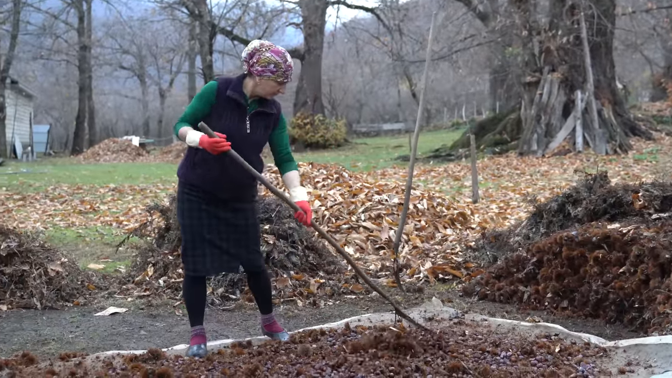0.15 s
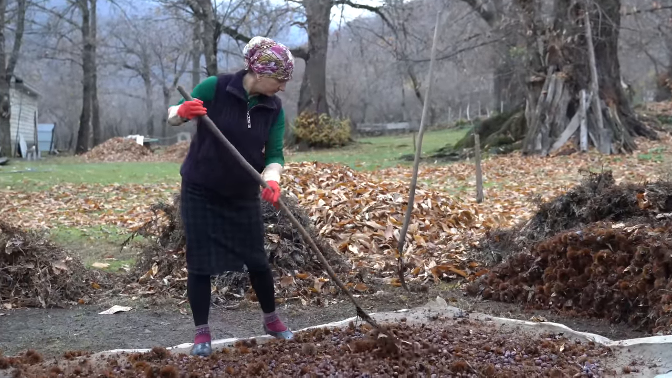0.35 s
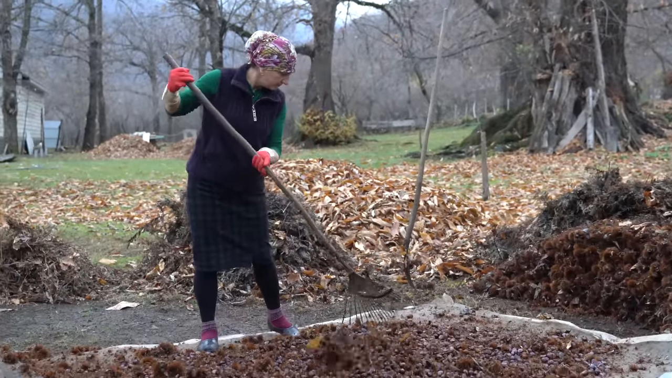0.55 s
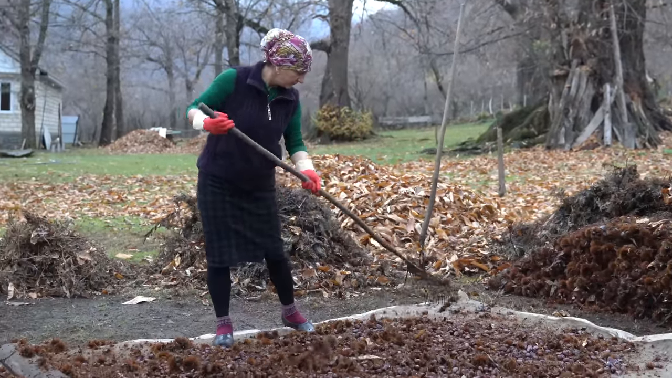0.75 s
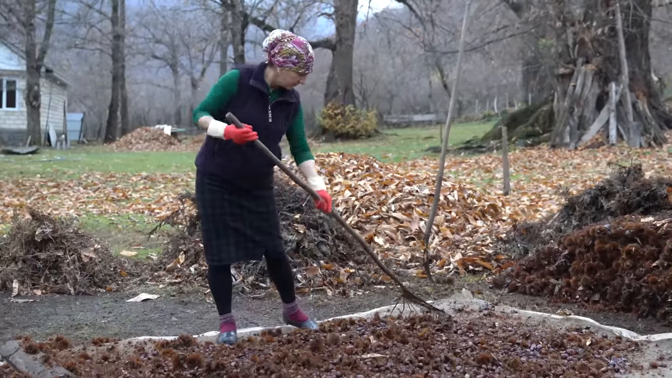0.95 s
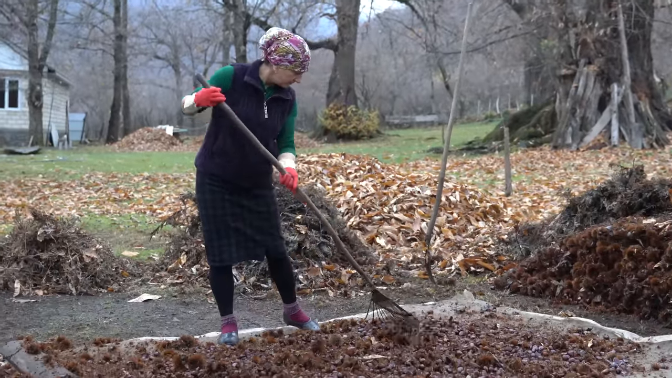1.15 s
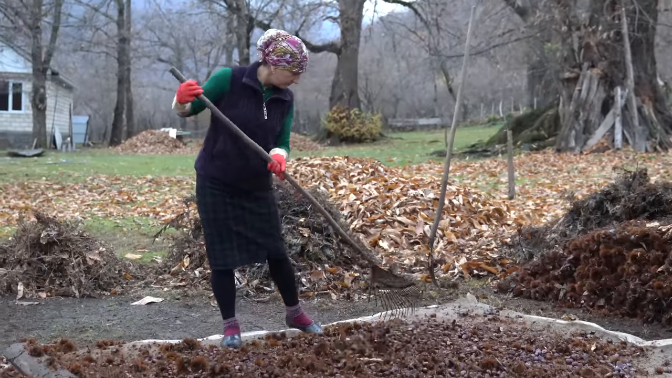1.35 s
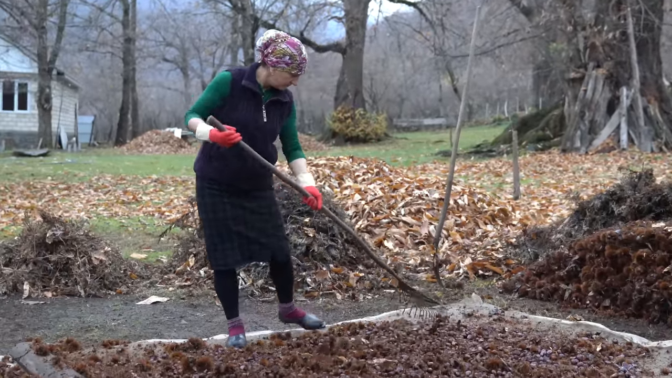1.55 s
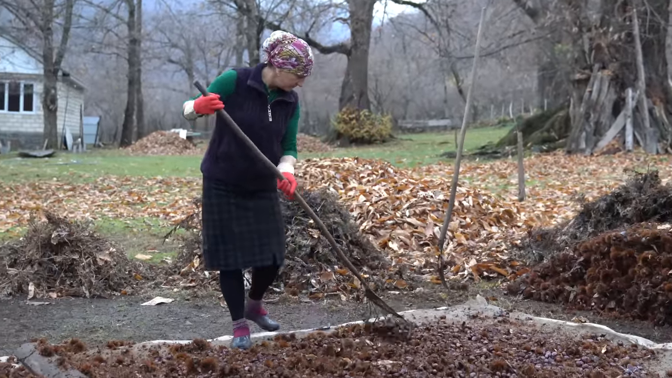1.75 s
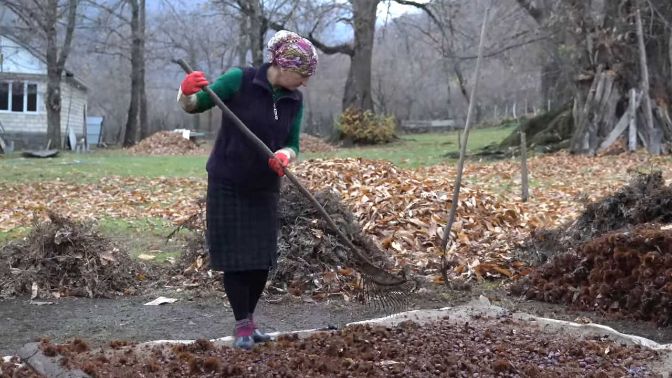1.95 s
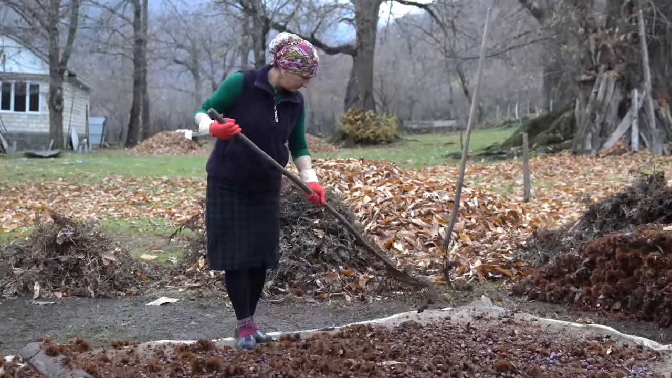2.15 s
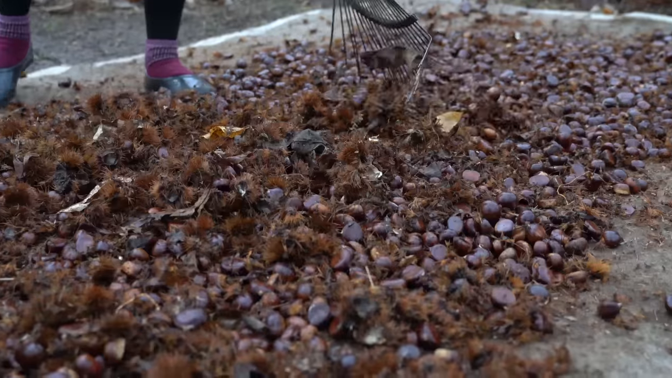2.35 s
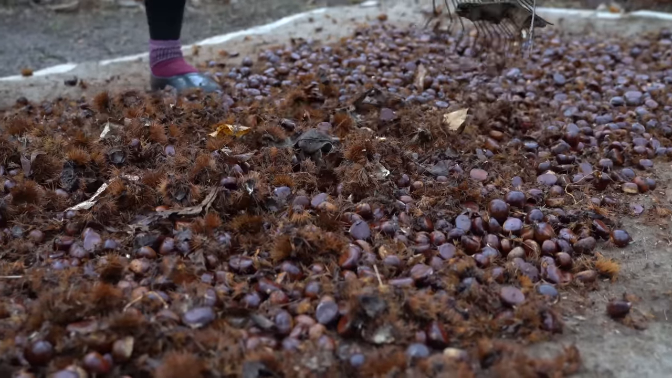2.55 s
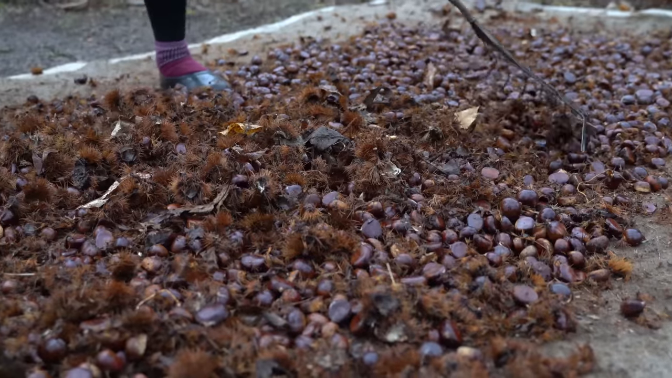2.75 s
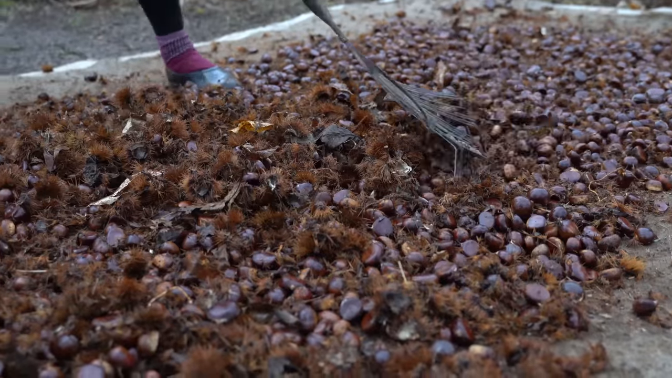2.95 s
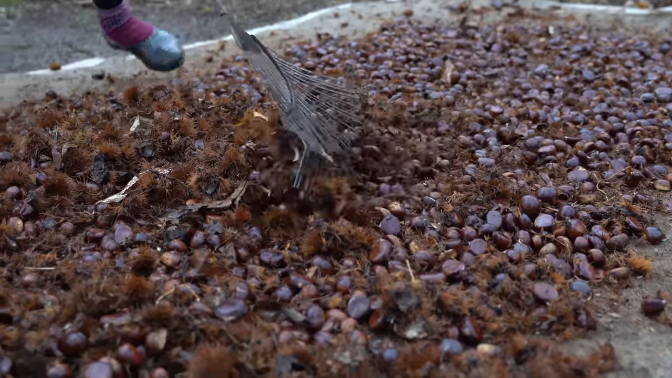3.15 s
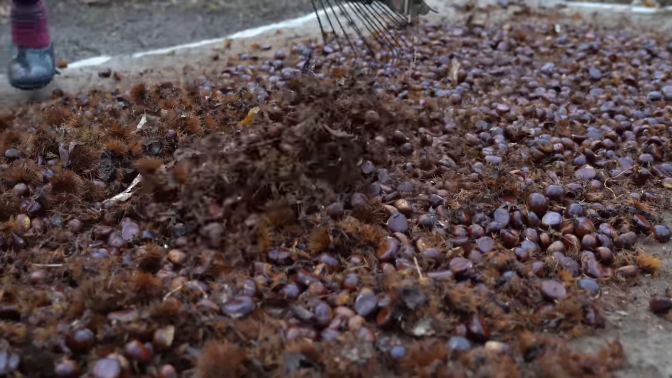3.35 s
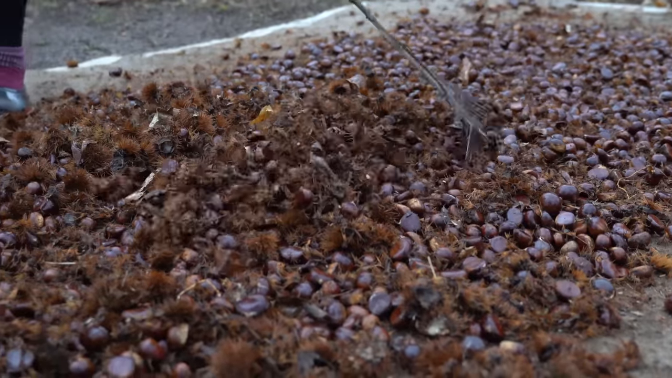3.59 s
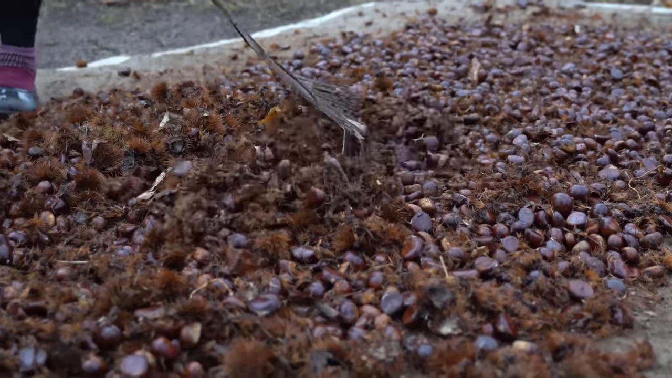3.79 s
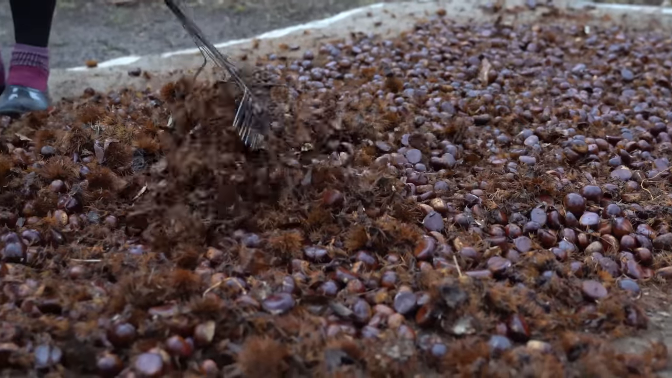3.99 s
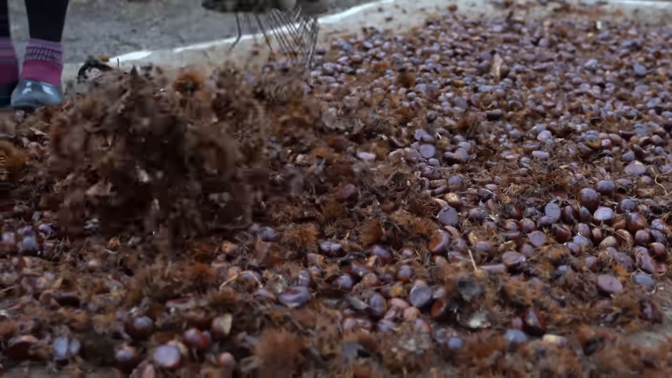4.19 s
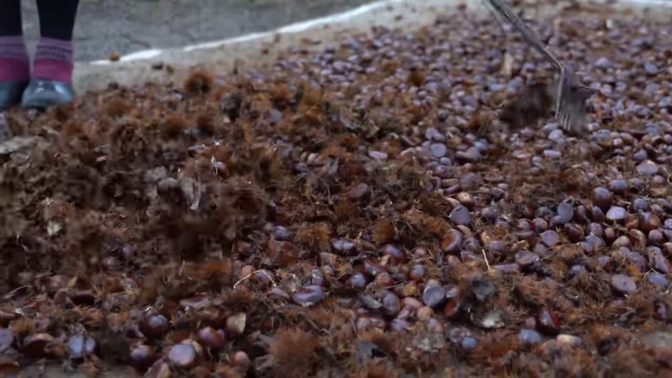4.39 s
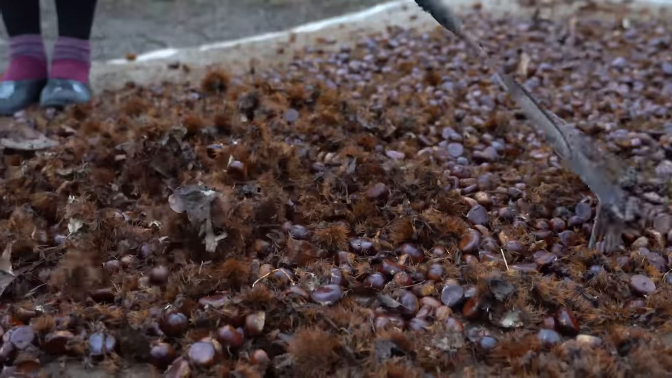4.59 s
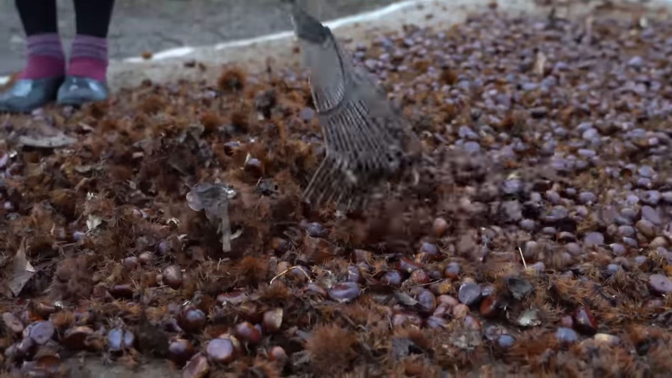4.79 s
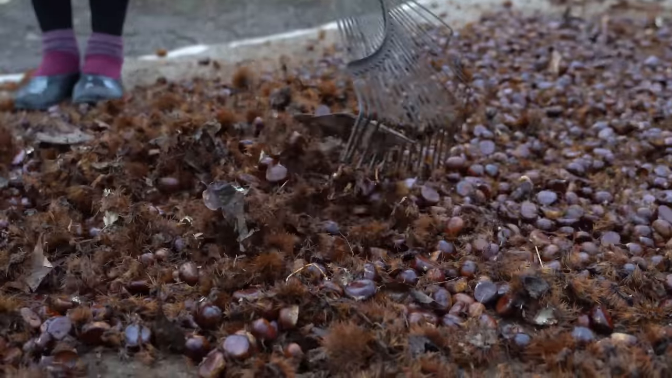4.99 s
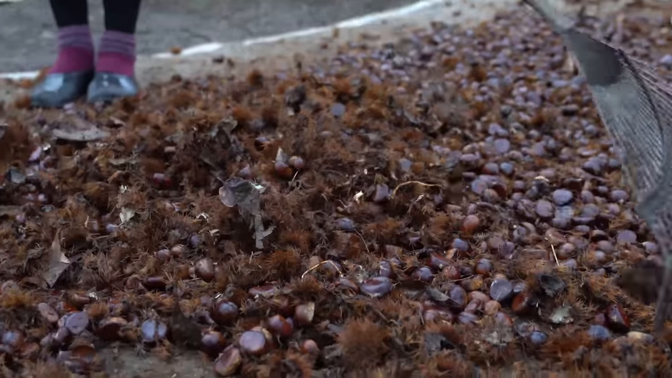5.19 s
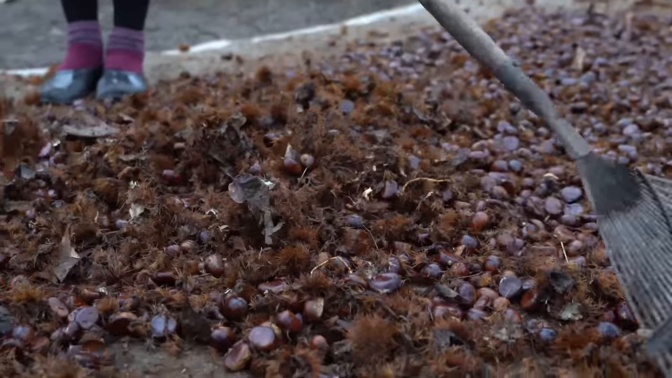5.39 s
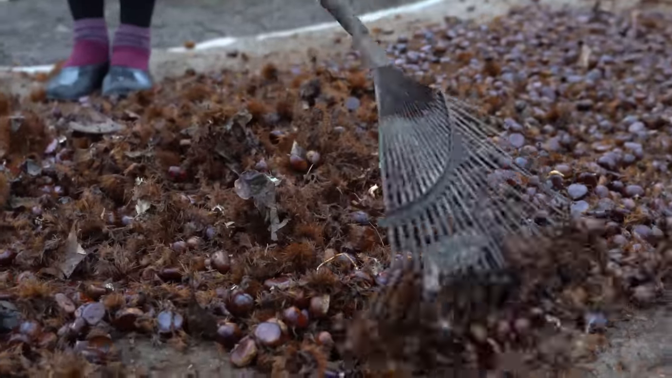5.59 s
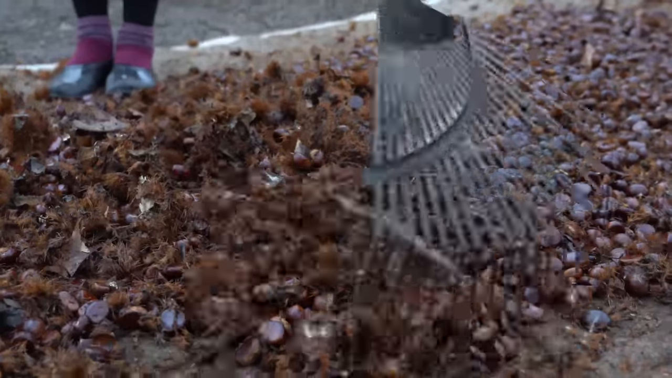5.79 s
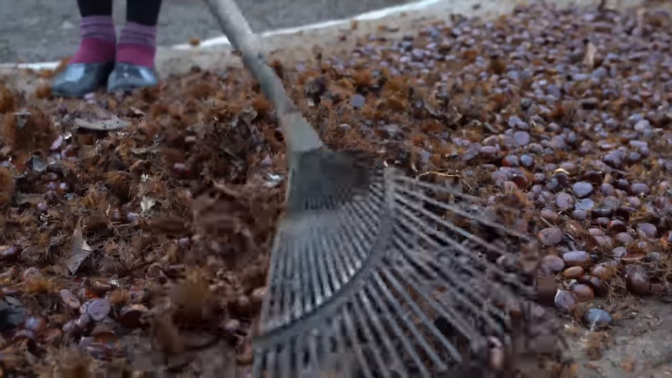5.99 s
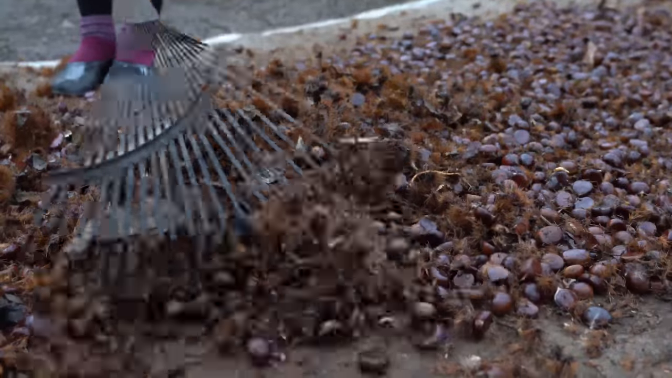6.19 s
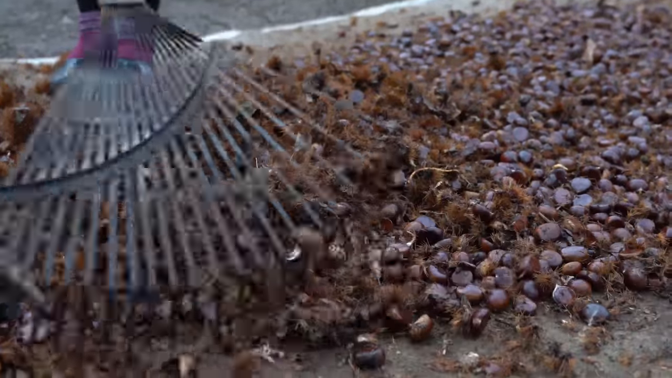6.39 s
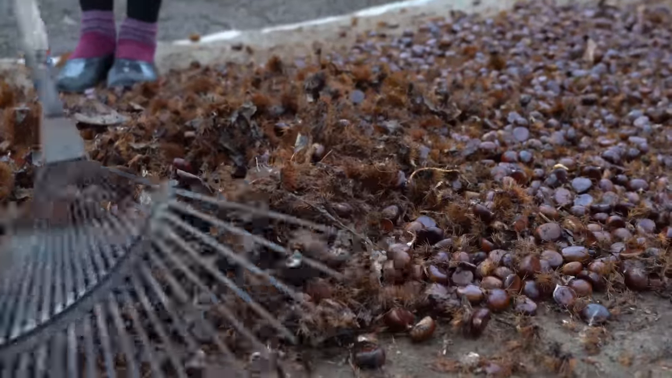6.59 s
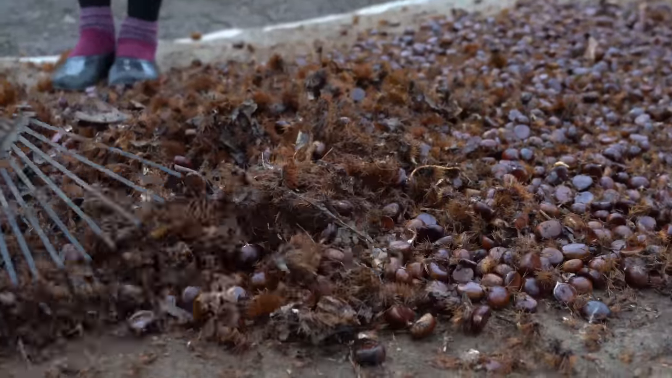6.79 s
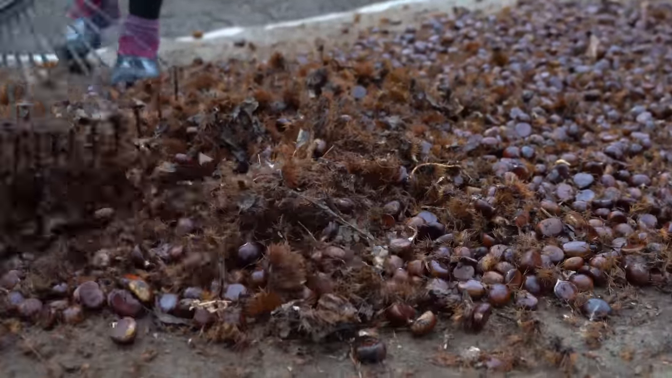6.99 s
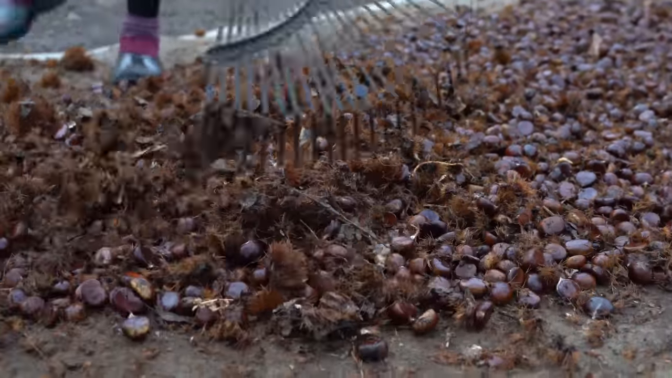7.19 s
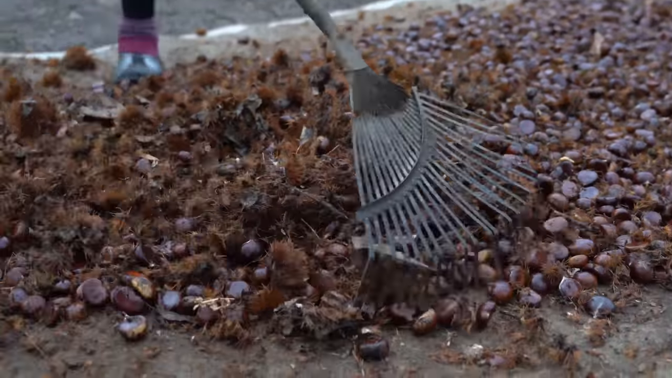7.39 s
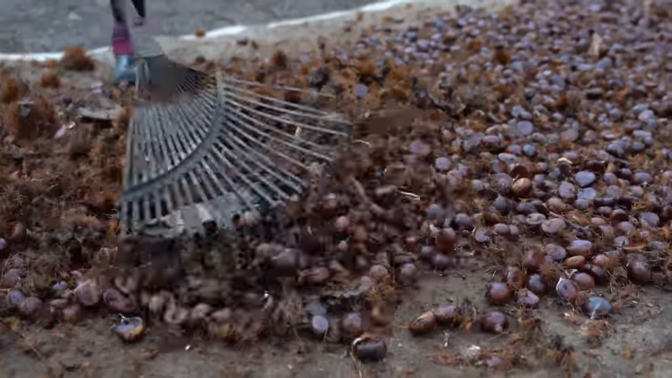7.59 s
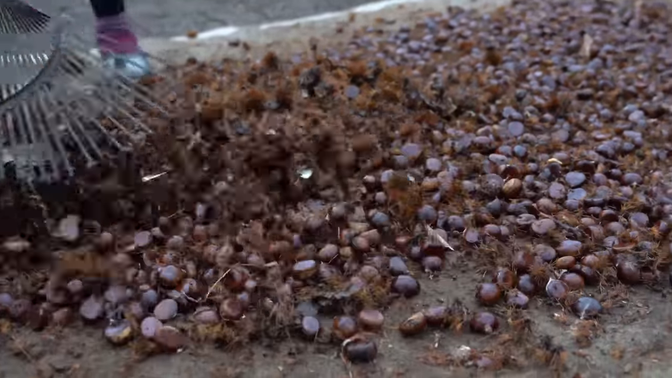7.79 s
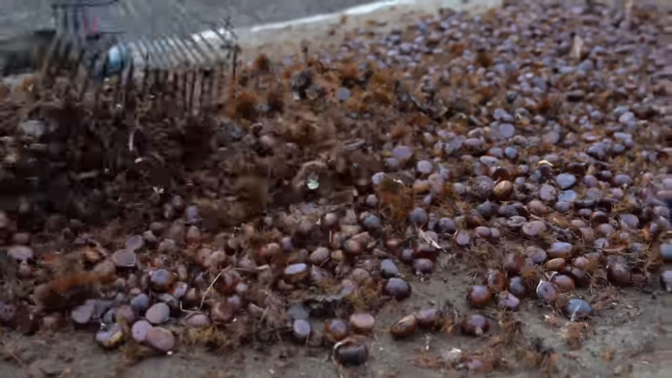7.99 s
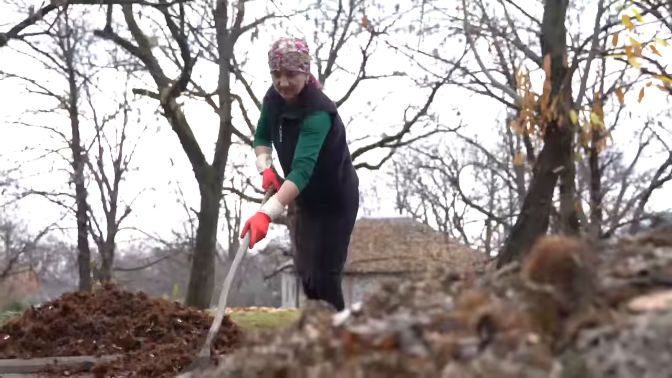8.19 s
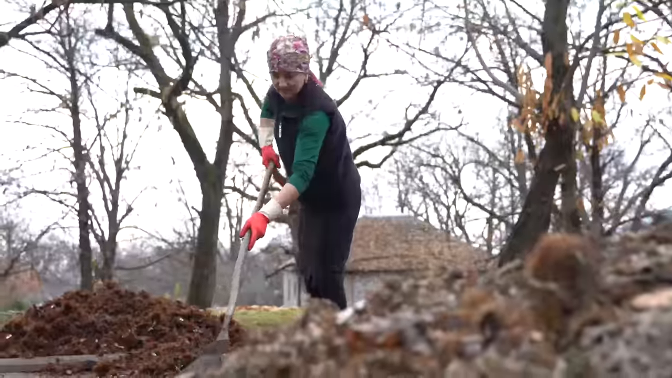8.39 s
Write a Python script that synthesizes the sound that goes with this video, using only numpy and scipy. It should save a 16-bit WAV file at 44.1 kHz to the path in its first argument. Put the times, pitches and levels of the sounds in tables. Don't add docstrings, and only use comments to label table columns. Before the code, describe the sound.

Brittle, bright raking strokes swell quickly and fade, each made of snapping spines, leaf rustle and springy tine scratch. The early pulls sound farther away; from about two and a half seconds the microphone seems near the ground, with sharp catches, knocking nuts, metallic chatter and soft thuds. Quiet open air and a faint far engine fill the gaps, and the last stroke is distant and weak.

```python
import sys
import numpy as np
from scipy import signal
from scipy.fft import rfft, irfft, next_fast_len
from scipy.io import wavfile
from scipy.ndimage import uniform_filter1d, map_coordinates

SR = 44100
rng = np.random.default_rng(int(sys.argv[2]) if len(sys.argv) > 2 else 0)


def store_pcm(level_fs):
    pcm = np.round(np.clip(level_fs, -1, 1) * 32767).astype(np.int16)
    wavfile.write(sys.argv[1], SR, np.atleast_2d(pcm).T)


def gain_from_decibels(decibels):
    exponent = np.asarray(decibels, float) / 20
    return 10 ** exponent


N = 372644
SIDES = np.array([[1], [-1]])

# hz, level_db_per_hz
BREEZE_SPECTRUM = [(120, -68), (200, -13), (350, -13), (933, -5.5), (1060, -8.5), (1160, -7), (2250, -10.5),
                   (4040, -13), (4430, -8), (14600, -25.5), (16000, -15)]
# hz, level_db_per_hz
ENGINE_SPECTRUM = [(20, -32), (70, -9), (90, -6), (108, -1.5), (120, -8), (136, 4.5), (200, -10),
                   (500, -120)]
# pull_start_s, full_pull_s, lift_s, full_pull_db, softer_start_db
STROKES = [(-.6, -.4, -.2, -40, 10), (.25, .39, .5, -37.5, 9), (1.085, 1.195, 1.335, -31, 10),
           (1.735, 1.82, 1.93, -35, 12), (2.34, 2.365, 2.5, -34, 2), (2.8, 3.0, 3.06, -28, 12),
           (3.64, 3.76, 3.96, -35, 3), (4.672, 4.775, 4.925, -24.5, 9), (5.48, 5.54, 5.93, -39.5, 10),
           (6.062, 6.155, 6.26, -29, 9), (6.63, 6.75, 6.97, -34.5, 19), (7.42, 7.62, 7.89, -35.5, 5),
           (8.178, 8.32, 9.9, -44.5, 9)]
# leaves_rel_db, tines_rel_db, ground_rel_db, rolling_db, rolling_fade_db_per_s
LITTER = [(2, -3, -22, -56, 18), (1, -2, -13, -52, 32), (2, -5, -25, -51, 38), (2, -4, -22, -55.5, 28),
          (-4, -1, -19, -44, 48), (-4, -1, -23, -45, 20), (-3, 0, -17, -45.5, 16), (0, 2, -29, -52, 15),
          (2, 2, -11, -50, 30), (-3, 1, -13, -48.5, 24), (-2.5, 2.5, -6.5, -48.5, 18), (1, 4, -12, -49, 26),
          (1.5, 2, -13, -60, 20)]
# hz, level_db_per_hz
SPINE_SPECTRUM = [(1500, -120), (2500, -10), (3300, -6), (4200, -4.5), (5300, -1), (6500, -9), (8000, -22),
                  (11000, -9), (16000, -45)]
# hz, level_db_per_hz
LEAF_SPECTRUM = [(3000, -120), (5500, 3.5), (7500, 4.5), (9000, 3), (11000, 2.5), (13500, 8), (15500, 7),
                 (17000, -38)]
# hz, level_db_per_hz
GROUND_SPECTRUM = [(30, -32), (120, -19), (200, -11), (330, -8), (500, -1.5), (800, 4.5), (1100, 2),
                   (1800, -14), (4000, -120)]
# mode_hz, width_hz, level_db
TINE_MODES = [(985, 290, -8.5), (1270, 130, 2), (1517, 202, 1), (1926, 304, 0), (2420, 270, 2),
              (2790, 240, -.5), (3400, 480, -5.5)]
# peak_s, spines_db, leaves_rel_db, tines_rel_db
TICKS = [(0.016, -53.5, 5.0, -1.0), (0.14, -57, 4, -10), (0.254, -46, 7, -5), (0.318, -40.0, 5.5, -6.5),
         (0.35, -31.5, 2.0, -9.0), (0.67, -56, 5, -8), (0.8695, -57, 1, -12), (1.035, -37.5, -2.0, -12.5),
         (1.395, -54, 5, -8), (1.4916, -54, 0, -4), (1.838, -32.0, 12.5, -8.0), (2.603, -53, 2, -2),
         (2.638, -47.0, 0.5, -2.0), (3.133, -37.0, 7.0, -5.0), (3.283, -34.0, -14.5, 1.5),
         (3.387, -45.5, 0.5, 0.5), (3.419, -45.0, 6.5, -6.5), (3.685, -34.0, 10.5, -4.0),
         (3.894, -41.0, 10.5, -2.0), (4.03, -43.0, 5.0, -26.0), (4.231, -50, -3, -1), (4.782, -18.5, 0, -8),
         (5.058, -51.5, 1.0, -3.0), (5.768, -32.0, 11.0, -1.0), (6.009, -43.0, 0.5, 4.5),
         (6.023, -33.5, -0.5, 8.5), (6.232, -32.0, -0.5, -8.5), (6.759, -26.0, -15.0, -9.5),
         (6.895, -37.5, -22.5, 6.0), (7.259, -49.5, 4.0, -4.5), (7.31, -55, -3, -3),
         (7.688, -41.0, -14.5, 13.0), (7.964, -50.0, 7.0, -4.0), (8.215, -47, 3, -4), (8.3, -44, 2, -3),
         (8.343, -44, 2, -3), (8.365, -44, 2, -3), (8.403, -45, 2, -3), (8.445, -44, 4, -3)]
# peak_s, spines_db, leaves_rel_db, tines_rel_db
BITES = [(0.527, -40.5, -3.0, -8.5), (0.976, -35.5, -13.0, -10.0), (1.742, -29.5, -1.0, -14.0),
         (2.025, -53.0, 6.5, 1.0), (2.412, -33.5, 10.5, 0.0), (2.802, -35.0, 4.0, -7.0),
         (2.901, -22.0, -6.0, -8.0), (3.096, -34.0, 3.0, 6.0), (3.11, -33.5, -1.0, 3.0),
         (3.178, -39.5, 7.5, 7.0), (3.649, -28.5, 5.0, -14.0), (4.161, -30.5, 5.5, -1.0),
         (4.25, -43.0, -8.0, 1.0), (4.417, -44.5, -5.5, 4.5), (4.679, -29.5, 3.5, 0.5),
         (6.358, -34.5, 7.5, 0.5), (6.967, -42.5, -3.0, -5.0), (7.084, -47.5, -4.5, -8.5),
         (7.416, -37, 5, -1), (7.61, -30, 8, 0), (7.747, -33.5, 3.5, -3.5), (7.985, -42, 4, -3)]
# peak_s, spines_db, leaves_rel_db, tines_rel_db
SNAGS = [(0.228, -51.0, 3.5, 4.5), (0.47, -44.5, 1.5, -13.5), (0.55, -54.5, -5.0, 7.0),
         (1.01, -46.0, 5.0, 0.0), (1.06, -44.5, -3.5, -2.0), (1.132, -30.5, 1.5, -14.0),
         (1.168, -32.0, 2.0, -13.5), (1.798, -30.5, 8.0, -5.5), (2.351, -31.5, 4.5, -1.5),
         (2.86, -31.5, -2.5, -4.5), (2.926, -20.0, -8.5, -5.0), (2.953, -18.0, -2.0, -7.5),
         (3.065, -36.0, 2.0, 0.0), (3.155, -51.5, 6.5, 10.0), (3.215, -44.0, -3.5, -5.5),
         (3.777, -33.5, -17.5, 5.5), (3.857, -32.5, 6.0, 3.0), (4.325, -49.5, -14.0, -5.5),
         (4.35, -57.5, -6.0, 0.0), (4.385, -48.5, -15.0, -5.5), (4.435, -61.5, -8.0, 15.0),
         (4.632, -34.5, 2.5, 5.5), (4.966, -43.0, 2.0, 5.0), (6.074, -31.5, -4.5, 5.5),
         (6.612, -34.5, -8.0, -3.0), (7.539, -28.0, 0.5, -11.0), (7.571, -33.0, 5.0, -3.0),
         (7.802, -39.5, 6.5, 3.5), (7.822, -41.5, -3.0, 6.0), (7.845, -38.5, -2.5, 3.5)]
# peak_s, spines_db, leaves_rel_db, tines_rel_db
HEAVES = [(0.207, -46.5, 8.0, -0.5), (0.5, -46.5, 4.5, 2.0), (0.6, -46.5, -2.0, 0.0),
          (0.635, -48.5, -3.5, -4.5), (0.985, -39.5, -11.5, -4.5), (1.715, -36.5, -0.5, -8.5),
          (2.385, -25.5, 1.0, -5.0), (3.493, -51.0, -24.5, 3.5), (3.559, -60.5, -0.5, 16.0),
          (3.735, -34.5, 1.5, 5.0), (3.761, -23.0, -2.0, -6.0), (3.824, -29.5, 1.5, -1.5),
          (5.447, -44.5, 2.5, -1.0), (5.603, -32.0, 3.0, 4.0), (5.636, -37.0, -23.5, 7.0),
          (5.682, -37.5, -7.0, 8.5), (6.101, -32.5, 2.0, 1.5), (7.433, -36.0, 9.0, 7.0),
          (8.109, -58.0, 13.5, 5.5)]
# peak_s, spines_db, leaves_rel_db, tines_rel_db
PRICKS = [(0.3357, -39.0, -1.5, -4.5), (0.382, -41.5, 11.5, -2.5), (1.1574, -36.5, 9.0, -2.0),
          (1.1808, -41.5, 16.0, -12.0), (1.2571, -41.5, 3.0, -1.5), (1.689, -49.0, -14.5, 0.5),
          (1.9127, -44.5, 0.5, -12.5), (1.9286, -46.0, 0.5, -19.0), (2.06, -59.0, 7.0, -15.5),
          (2.144, -63.5, 10.5, -12.0), (2.3686, -32.0, 4.5, -8.5), (2.5238, -47.0, 4.5, 1.5),
          (2.5562, -56.5, 3.5, 4.0), (2.8765, -33.0, -4.5, 1.5), (2.9139, -32.5, -18.0, 2.5),
          (2.9737, -29.0, 1.0, 0.0), (2.9867, -34.5, 8.0, 2.5), (3.0241, -21.5, -5.5, -7.5),
          (3.0735, -36.0, 8.5, -9.5), (3.6996, -39.0, 7.0, -14.5), (3.8727, -29.0, -16.0, -6.0),
          (4.1196, -48.5, -7.5, -3.0), (4.7118, -28.0, -2.5, -3.0), (4.7273, -28.0, -0.5, -10.5),
          (4.7941, -24.5, 3.0, -11.5), (4.9268, -49.0, -4.5, -7.5), (5.6287, -37.5, -8.5, 7.0),
          (5.741, -36.0, -3.5, -15.5), (5.8407, -47.0, 1.0, -19.5), (6.0917, -36.5, 3.5, -9.5),
          (6.1351, -29.0, -0.5, -1.0), (6.149, -28.0, -3.5, -12.5), (6.2678, -38.5, -5.0, -4.5),
          (6.2997, -54.0, 7.5, 8.5), (6.38, -53.5, 6.0, -6.0), (6.6604, -46.0, -16.5, 0.5),
          (6.6908, -34.5, -8.5, -5.5), (6.824, -33.5, -3.5, -8.5), (6.9432, -51.5, -1.0, 3.5),
          (7.0161, -50.5, 8.0, -11.0), (7.102, -52.0, 0.5, -2.0), (7.19, -60.5, 14.0, -8.0),
          (7.4401, -29.0, 2.0, -4.0), (7.5997, -28.0, 4.0, -4.0), (7.6312, -25.0, 1.0, -6.0),
          (7.6611, -44.0, 11.0, 9.0), (7.6691, -45.5, 17.5, -5.5), (7.717, -48.5, -3.0, 12.5),
          (7.7808, -50.0, -0.5, -11.5), (7.8871, -48.5, -4.0, 1.5)]
# peak_s, spines_db, leaves_rel_db, tines_rel_db
SLIPS = [(0.2933, -39.5, -5.5, 0.5), (0.3966, -39.0, 8.5, -3.0), (0.4824, -45.5, 4.0, -8.5),
         (1.2023, -38.0, 5.0, -14.5), (1.2342, -34.5, 3.5, -2.0), (1.2985, -41.5, 5.5, -4.0),
         (1.8742, -41.5, 3.5, -6.0), (2.2065, -58.0, -7.5, -6.5), (3.0072, -24.0, -6.5, -1.5),
         (3.6622, -36.0, 2.0, 0.5), (3.725, -31.0, 2.0, -1.5), (3.9575, -52.0, 3.5, 6.5),
         (3.9755, -56.0, -6.5, 14.5), (4.0613, -43.0, -13.5, -1.5), (4.1406, -50.0, -10.5, 4.5),
         (4.2688, -50.5, 0.0, 6.0), (4.3366, -44.5, -19.0, 0.0), (4.3691, -50.0, -9.5, 3.0),
         (4.619, -46, -8, 8), (4.655, -47.5, -3.0, 9.0), (4.6983, -32.0, -1.5, 5.5),
         (4.7407, -24.0, -5.0, 1.5), (4.7662, -22.0, -6.5, -3.0), (4.8225, -35.0, 6.0, 6.5),
         (4.8465, -32.0, 7.5, 2.0), (5.1388, -52.0, 3.5, -6.5), (5.5165, -36.5, 3.0, -1.5),
         (5.5738, -37.0, -10.5, 10.5), (5.7005, -43.0, 10.5, 8.0), (5.86, -51.5, 3.0, 2.0),
         (6.045, -43.5, 2.0, 2.0), (6.1266, -29.5, -2.0, 1.0), (6.1585, -24.0, -21.0, -6.0),
         (6.174, -29.5, -2.0, -3.5), (6.2543, -35.0, -12.5, -2.0), (6.394, -57.5, 12.0, 6.5),
         (6.4194, -48.5, 6.5, -4.0), (6.45, -50.0, 2.5, -12.5), (6.5386, -57.0, 6.5, -12.0),
         (6.7282, -34.5, 6.0, -3.0), (6.8105, -44.5, 5.5, 12.0), (6.8499, -41.5, -13.0, 5.0),
         (6.9153, -45.0, -17.0, 6.0), (7.471, -41.5, -4.5, 3.0), (7.5024, -29.5, -18.5, 1.5),
         (7.5638, -33.5, 1.5, 2.5), (7.6486, -38.0, 2.5, 6.0), (7.7259, -43.0, 10.0, -10.5),
         (8.0677, -56.0, 6.5, -6.0), (8.1814, -50.5, 0.0, -1.0)]
# rise_s, t60_s
CATCH_ENVELOPES = [
    (.005, .04),
    (.0045, .085),
    (.012, .06),
    (.021, .078),
    (.003, .035),
    (.007, .05),
]
# time_s, left_right_db
RAKE_PAN = [(0, -1.5), (.6, -1), (1.2, -1.5), (2.9, -1.5), (3.3, 0), (4.8, -0.5), (5.35, -4.5), (5.7, -1.5),
            (6.8, 0), (7.3, -1.5), (8.45, 0.5)]
# hz, gain_db
FAR_TONE = [(6300, -0.5), (7800, 5), (9500, 1.5), (12000, -1.5), (15000, -4.5)]
# start_s, level_db, pitch_hz, t60_s, glide_hz_per_s
SINGING_TINES = [
    (0, -47, 2610, .13, 6000),
    (.068, -44, 2720, .09, -2000),
    (.155, -52, 2750, .12, -8000),
    (4.42, -57, 1060, 1.6, 0),
    (4.503, -35, 1950, .07, 30000),
    (4.522, -32, 5720, .045, 9000),
    (4.583, -33, 5900, .045, -12000),
    (5.16, -67, 565, 1.6, 0),
    (5.51, -32, 5450, .06, 0),
    (8.205, -46, 8250, .05, 0),
]
# start_s, peak_db, pitch_hz, ring_cycles
NUTS = [(.058, -33, 1000, 8), (.0755, -33, 1100, 9), (.1472, -37, 580, 8), (.1525, -33, 1300, 6),
        (3.2805, -17, 1480, 40), (3.39, -33, 780, 9), (4.249, -28, 1500, 9), (4.267, -29, 1550, 9),
        (4.301, -30, 760, 7), (4.309, -30, 760, 7), (4.322, -30, 1900, 8), (4.335, -24, 1340, 9),
        (4.363, -31, 1250, 8), (4.415, -25, 1200, 18), (4.498, -31, 1230, 12), (5.056, -30, 580, 7),
        (6.502, -10, 1500, 6), (7.08, -23, 1300, 7), (7.089, -23, 1250, 9), (7.121, -31, 1700, 7),
        (7.1385, -23, 1200, 12), (7.152, -22, 1400, 7), (7.2, -29, 1450, 13), (7.2135, -24, 1300, 9),
        (7.256, -26, 1700, 6)]
# start_s, peak_db, pitch_hz, ring_cycles
THUDS = [
    (3.55, -48, 280, 12),
    (4.405, -45, 330, 14),
    (5.425, -49, 240, 16),
    (6.01, -44, 210, 14),
    (6.12, -44, 170, 16),
    (6.74, -40, 220, 14),
]
# start_s, end_s, pitch_hz, level_db
RASPS = [
    (5.535, 5.71, 1275, -33),
    (5.565, 5.69, 2680, -40),
    (6.065, 6.175, 2540, -29),
]
# hz, likeness_0_to_1
PORT_LIKENESS = [(60, .97), (180, .98), (550, .95), (1200, .89), (2400, .78), (5000, .64), (15000, .48)]
# hz, left_right_db
PORT_TONE = [(60, 0), (300, .3), (600, 1.5), (1300, 1.7), (2300, 4.5), (3600, 1.5), (8000, -1.5),
             (15000, -3.5)]
# hz, left_lead_rad
PORT_PHASE = [(60, -.12), (400, -.5), (1550, -0.2), (2670, 1.58), (3270, -1.1), (4820, 0.86), (9300, 0.4),
              (11200, -1.2), (16500, -0.7)]


def unit(x):
    return x / np.sqrt(np.mean(x ** 2) + 1e-20)


def along(points, hz):
    f, v = np.transpose(points)
    return np.interp(np.log(hz + 1), np.log(f + 1), v)


def curves(rows):
    s, *columns = np.transpose(rows)
    return [np.interp(np.arange(N) / SR, s, c) for c in columns]


def wobble(knots_per_s):
    knots = rng.standard_normal(int(N * knots_per_s / SR) + 4)
    return map_coordinates(knots, [np.arange(N) * knots_per_s / SR])


def filtered(x, response):
    size = next_fast_len(N + 8192)
    return irfft(rfft(x, size) * response(np.fft.rfftfreq(size, 1 / SR)), size)[..., :N]


def colour(spectrum):
    return lambda hz: gain_from_decibels(along(spectrum, hz))


def small(x, low_hz):
    return filtered(x, lambda hz: (1j * hz / (low_hz + 1j * hz)) ** 3)


def heard(loudness, response):
    def mid_side(hz):
        turn = np.arccos(np.clip(along(PORT_LIKENESS, hz), 0, 1)) / 2
        return response(hz) * [np.cos(turn), np.sin(turn)]

    gain = np.sqrt(np.mean(np.abs(response(np.linspace(0, SR / 2, 4000))) ** 2))
    mid, side = filtered(loudness * rng.standard_normal((2, N)), mid_side)
    return (mid + SIDES * side) / gain


def air():
    pass_s, half_length_s, swell_db = 4.7, .5, 5
    passing_db = swell_db * np.exp(-((np.arange(N) / SR - pass_s) / half_length_s) ** 2)
    hum = heard(gain_from_decibels(-84 + 1.9 * wobble(6.4) + passing_db), colour(ENGINE_SPECTRUM))
    breeze = heard(gain_from_decibels(-62.5 + 1.96 * wobble(2.74)), colour(BREEZE_SPECTRUM))
    return breeze + hum


def drag():
    swell_power, hold_power = 1.2, 1.6
    lift_loss_db, let_go_db_per_s, settle_rise_s = 22, 150, .1
    t = np.arange(0, N, 32) / SR
    power = np.zeros((4, len(t)))
    for stroke, (*mix_db, rolling_db, fade_db_per_s) in zip(STROKES, LITTER):
        down, full, lift, db, softer_db = stroke
        before = np.clip((full - t) / (full - down), 0, 1)
        after = np.clip((t - full) / (lift - full), 0, 1)
        pull_db = db - 2.5 - softer_db * before ** swell_power - lift_loss_db * after ** hold_power
        pull = (t >= down) * gain_from_decibels(pull_db - let_go_db_per_s * np.maximum(t - lift, 0))
        rise = np.clip((t - full) / settle_rise_s, 0, 1)
        rolling = rise * gain_from_decibels(rolling_db - fade_db_per_s * np.abs(t - full))
        settle_db = [0, .3 + .6 * mix_db[0], 1, -9.5]
        power += (pull * gain_from_decibels(np.c_[[0, *mix_db]])) ** 2 + (rolling * gain_from_decibels(np.c_[settle_db])) ** 2
    return np.array([np.interp(np.arange(N) / SR, t, p) for p in power])


def catches():
    power, t = np.zeros((3, N + SR)), np.arange(SR // 8) / SR
    kinds = [TICKS, BITES, SNAGS, HEAVES, PRICKS, SLIPS]
    for rows, (rise_s, t60_s) in zip(kinds, CATCH_ENVELOPES):
        shape = np.minimum(np.sqrt(t / rise_s), gain_from_decibels(-60 * (t - rise_s) / t60_s))
        for peak_s, db, leaves_db, tines_db in rows:
            sizes = gain_from_decibels(db + np.array([[1.2], [leaves_db - 0.4], [tines_db + 1.16]]))
            start = round(max(peak_s - rise_s, 0) * SR)
            power[:, start:start + len(t)] += (sizes * shape) ** 2
    return power[:, :N]


def clumps(rate_hz, spread_db, life_s, steady):
    sizes = gain_from_decibels(2 * spread_db * np.minimum(rng.exponential(size=N), 3))
    snaps = (rng.random(N) < rate_hz / SR) * sizes
    power = signal.lfilter([1], [1, -np.exp(-1 / (life_s * SR))], snaps)
    return np.sqrt(steady + power / power.mean()) / np.sqrt(steady + 1)


def clacks(loudness, count, hz, cycles, spread_db):
    at, place, big = rng.random((3, count))
    pitch_hz = np.clip(hz * np.exp(0.426 * rng.standard_normal(count)), 900, 13000)[:, None]
    t = np.arange(300) / SR
    start = (at * N).astype(int)
    sizes = loudness[start] * gain_from_decibels(-spread_db * np.log(big + 0.035))
    decay = gain_from_decibels(-60 * pitch_hz * t / cycles) * np.cos(np.pi / 2 * t / t[-1])
    tones = sizes[:, None] * np.sin(2 * np.pi * pitch_hz * t) * decay
    where = (start[:, None] + np.arange(len(t))).ravel()
    pans = gain_from_decibels(SIDES * 8 * (place - .5))
    return np.array([np.bincount(where, (g[:, None] * tones).ravel(), N + len(t))[:N] for g in pans])


def tine_ringing(hz):
    total = 0
    for k, (mode_hz, width_hz, db) in enumerate(TINE_MODES):
        damping = 1j * hz * width_hz
        total = total + (-1) ** k * gain_from_decibels(db) * damping / (mode_hz ** 2 - hz ** 2 + damping)
    return total * hz / (hz + 900)


def patchy(x, depth_db, bins, frames):
    near_start_s, near_end_s = 2.3, 8.17
    hz, t, z = signal.stft(x, SR, nperseg=256)
    field = uniform_filter1d(rng.standard_normal(z.shape[1:]), bins, 0)
    field = uniform_filter1d(field, frames, 1)
    far = (t < near_start_s) | (t > near_end_s)
    gain_db = depth_db * unit(field) + along(FAR_TONE, hz)[:, None] * far
    return signal.istft(z * gain_from_decibels(gain_db), SR, nperseg=256)[1][:, :N]


def rake():
    stir = drag() * clumps(80, spread_db=0.9, life_s=0.0025, steady=3.2) ** 2
    on_spines, on_leaves, on_tines = catches()
    spines = np.sqrt(stir[0] + on_spines)
    leaves = np.sqrt(stir[1] + on_leaves)
    tines = np.sqrt(stir[2] + on_tines)
    ground = np.sqrt(stir[3] + gain_from_decibels(-37) * on_tines)

    knocks = clacks(gain_from_decibels(-6) * tines, count=3000, hz=2060, cycles=40, spread_db=1.5)
    knocks += clacks(gain_from_decibels(-10) * spines, count=3500, hz=5620, cycles=78, spread_db=4.0)

    spine_grain = clumps(600, spread_db=2, life_s=.001, steady=1.0)
    leaf_grain = clumps(700, spread_db=4, life_s=0.001, steady=0.5)
    tine_grain = clumps(200, spread_db=0.0, life_s=0.004, steady=0.72)
    ground_grain = clumps(90, spread_db=-3.3, life_s=0.0059, steady=3.0)
    bodies = heard(spines * spine_grain, colour(SPINE_SPECTRUM))
    bodies += heard(leaves * leaf_grain, colour(LEAF_SPECTRUM))
    bodies += heard(gain_from_decibels(-1.5) * tines * tine_grain, tine_ringing)
    bodies += heard(ground * ground_grain, colour(GROUND_SPECTRUM))

    pan = gain_from_decibels(SIDES * curves(RAKE_PAN)[0] / 2)
    return pan * (patchy(bodies, depth_db=2.5, bins=5, frames=7) + small(knocks, low_hz=520))


def shiver():
    rise_s, glide_s = .006, .02
    out, t = np.zeros(N + SR), np.arange(SR // 2) / SR
    unsteady_rad = np.pad(.95 * wobble(60), (0, SR))
    for start_s, db, hz, t60_s, glide_hz_per_s in SINGING_TINES:
        start = round(start_s * SR)
        span = slice(start, start + len(t))
        pitch_hz = hz + glide_hz_per_s * np.minimum(t, glide_s)
        swell = gain_from_decibels(db - 60 * t / t60_s) * (1 - np.exp(-t / rise_s)) ** 2
        out[span] += swell * np.sin(2 * np.pi * np.cumsum(pitch_hz) / SR + unsteady_rad[span])
    return out[:N]


def nuts():
    modes = [(.75, 0.9), (1.01, 0.95), (1.26, 0.7), (1.65, 0.3)]
    out, t = np.zeros(N + SR), np.arange(SR // 20) / SR
    for start_s, db, hz, cycles in NUTS + THUDS:
        knock = sum(share * np.sin(2 * np.pi * ratio * hz * t) for ratio, share in modes)
        snap = .08 * rng.standard_normal(len(t)) * gain_from_decibels(-60 * t / 0.0055)
        motion = knock * gain_from_decibels(-60 * hz * t / cycles) * (1 - np.exp(-t / 0.00035)) ** 2
        sound = np.gradient(motion, t) / (2 * np.pi * hz)
        out[round(start_s * SR):][:len(t)] += gain_from_decibels(db - 5.5) * (sound + snap)
    return small(out[:N], low_hz=160)


def rasp():
    out = np.zeros(N)
    throb, drift_rad = gain_from_decibels(6 * wobble(90) - 3), 1.6 * wobble(110)
    for k, (start_s, end_s, hz, db) in enumerate(RASPS):
        at = np.arange(round(start_s * SR), round(end_s * SR))
        own = at - k * SR
        swell = np.sin(np.pi * np.linspace(0, 1, len(at))) ** 0.24
        out[at] += gain_from_decibels(db) * swell * throb[own] * np.sin(2 * np.pi * hz * at / SR + drift_rad[own])
    return out


def scene():
    return air() + rake() + shiver() + nuts() + rasp()


def low_pass(x):
    return signal.sosfilt(signal.butter(12, 16960, fs=SR, output="sos"), x)


def record(dry):
    def ports(hz):
        gain_db = SIDES * along(PORT_TONE, hz) / 2 - 29 * (hz > 15850)
        return gain_from_decibels(gain_db) * np.exp(1j * SIDES * along(PORT_PHASE, hz) / 2)

    mix = filtered(dry, ports)
    return low_pass(mix)


dry = scene()
out = record(dry)
store_pcm(out)
```